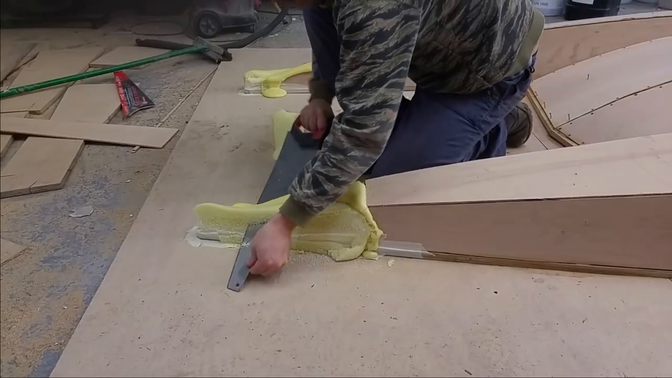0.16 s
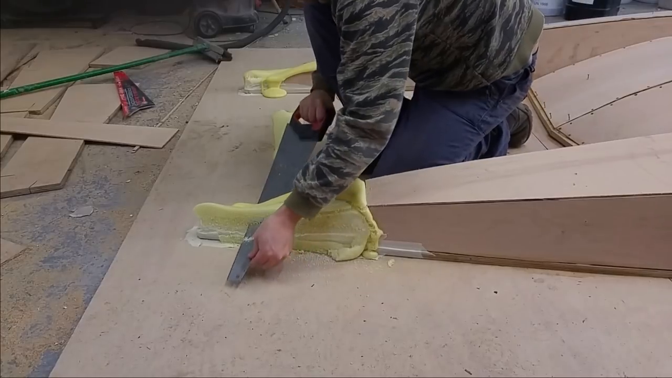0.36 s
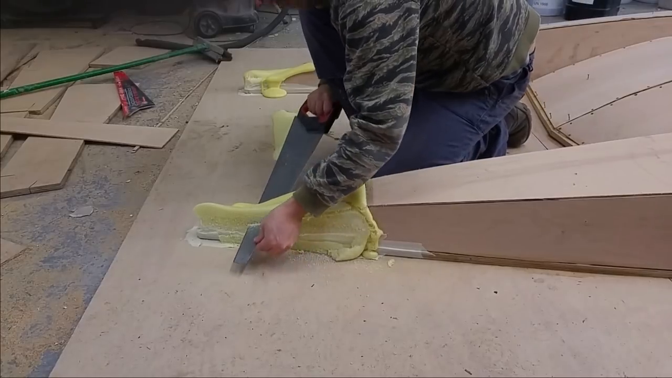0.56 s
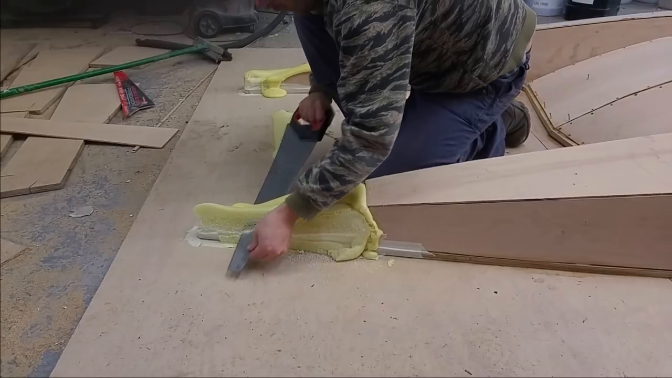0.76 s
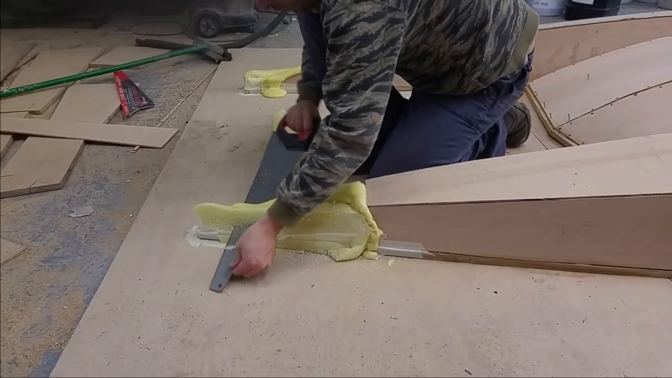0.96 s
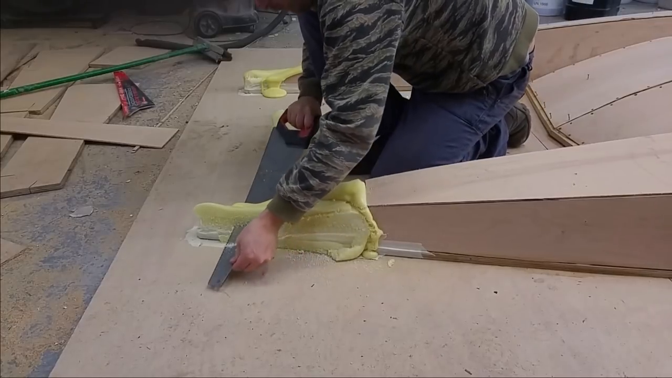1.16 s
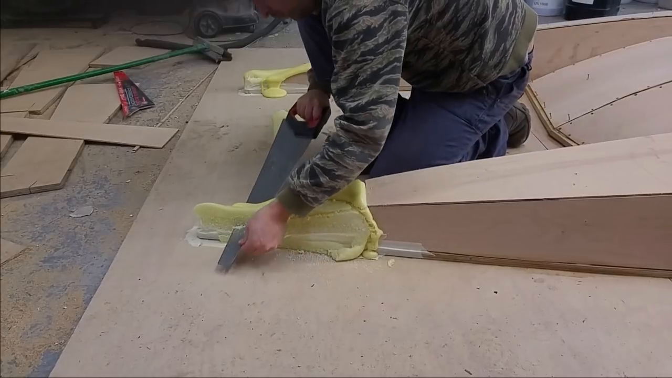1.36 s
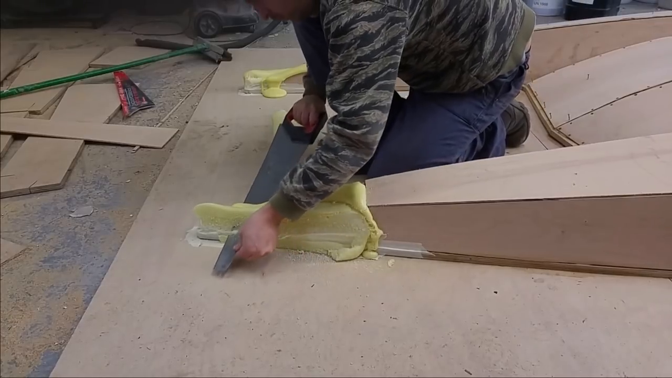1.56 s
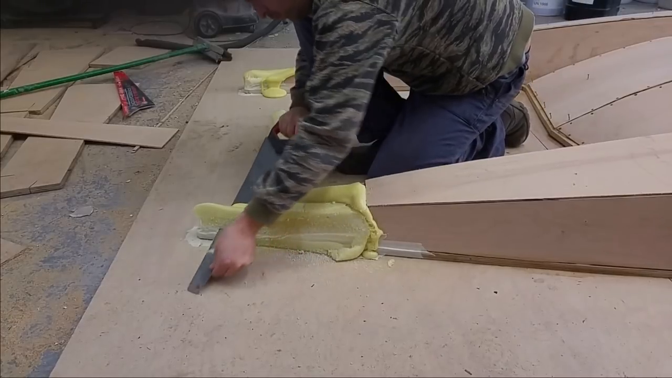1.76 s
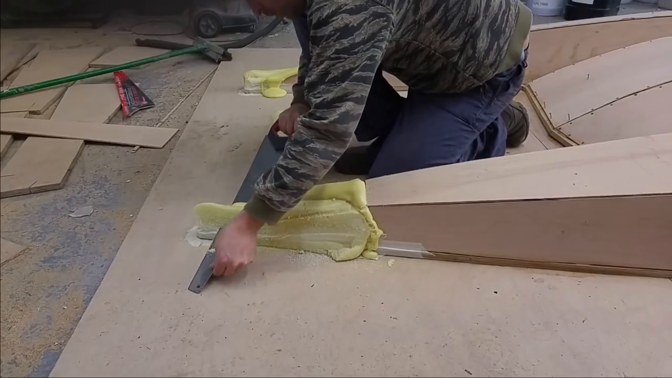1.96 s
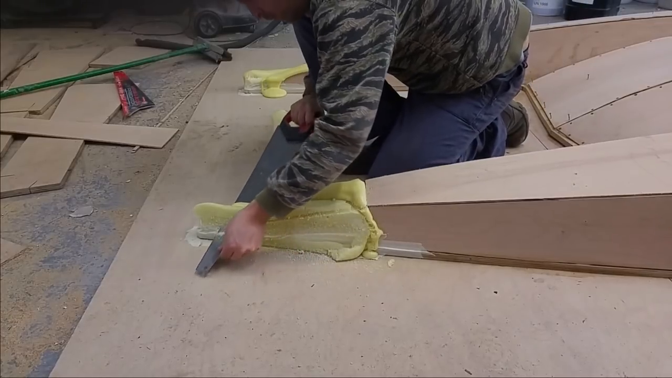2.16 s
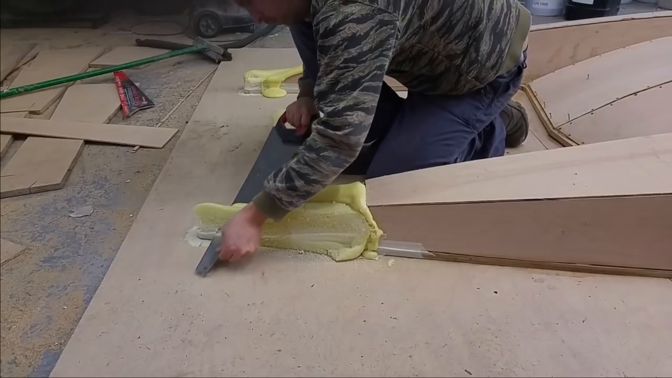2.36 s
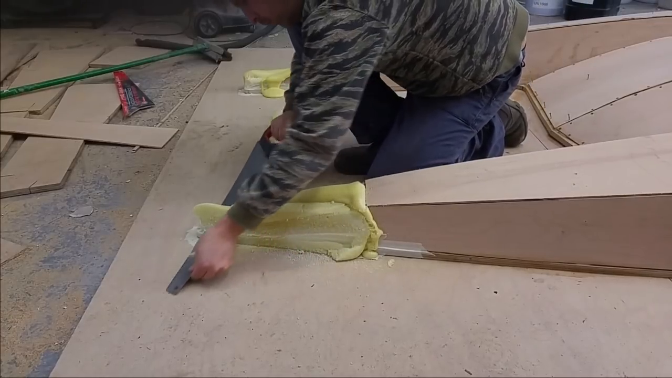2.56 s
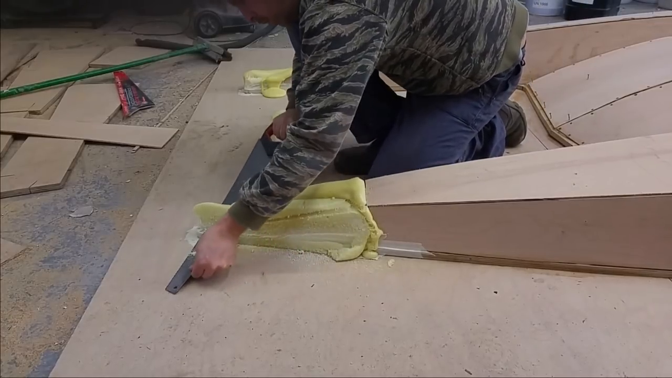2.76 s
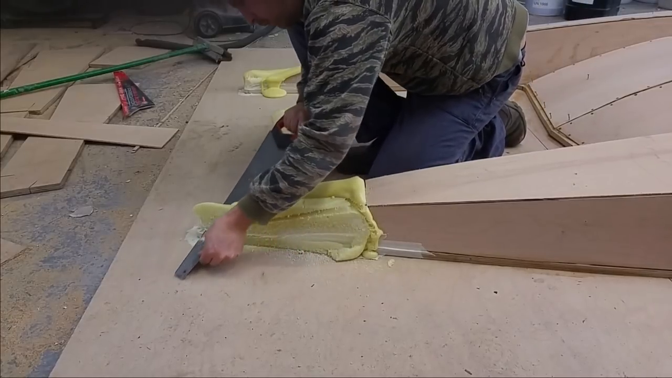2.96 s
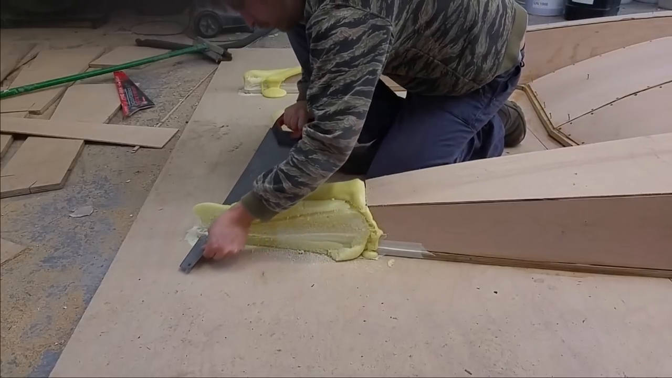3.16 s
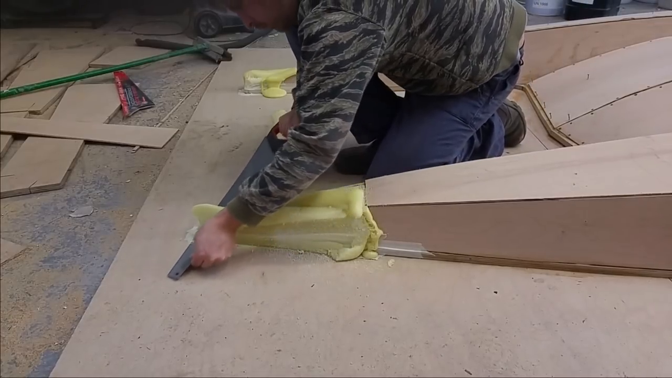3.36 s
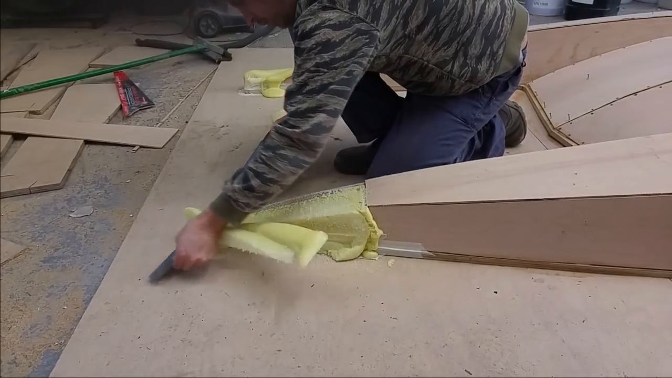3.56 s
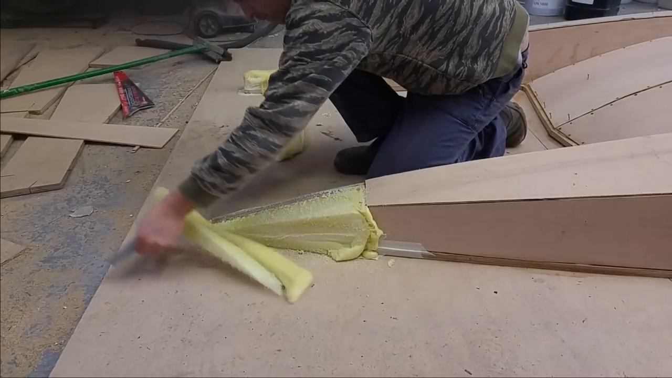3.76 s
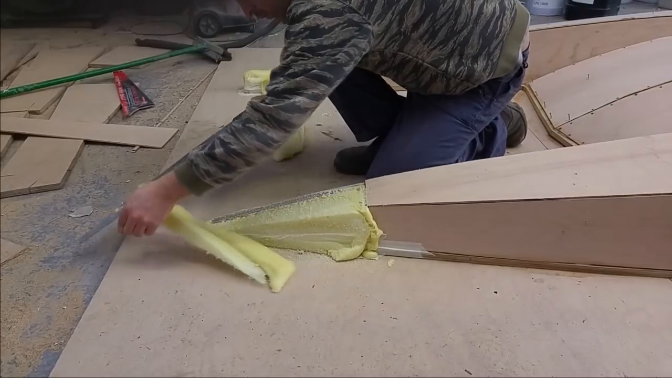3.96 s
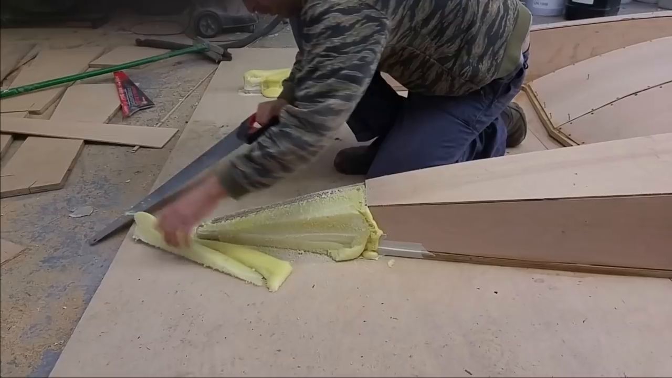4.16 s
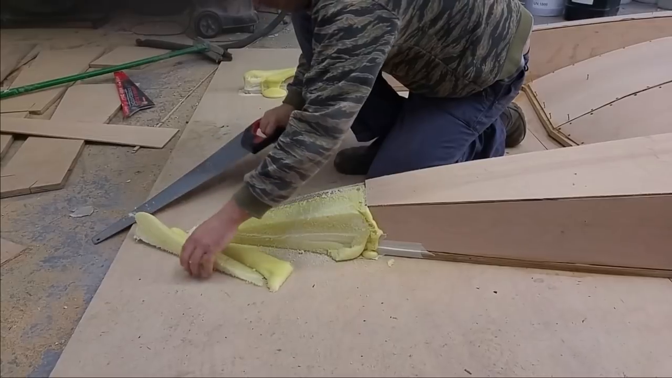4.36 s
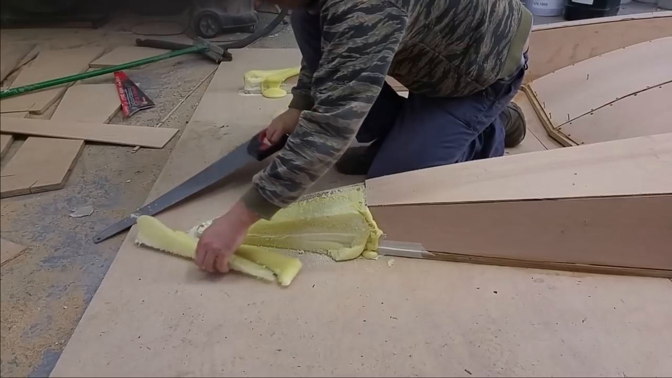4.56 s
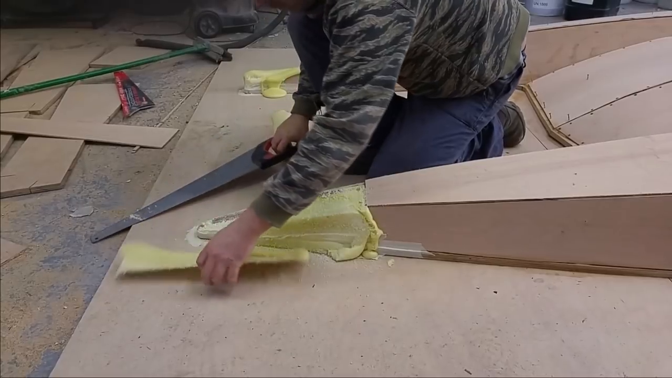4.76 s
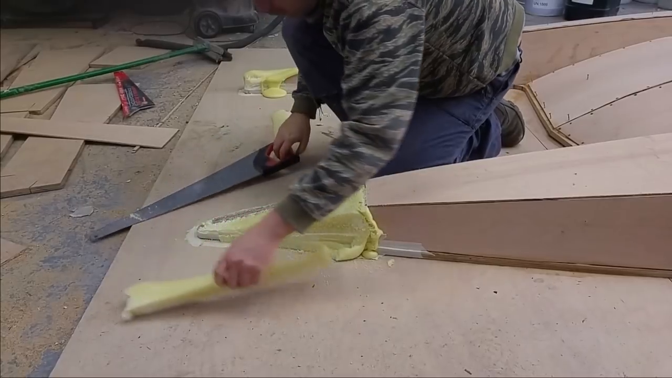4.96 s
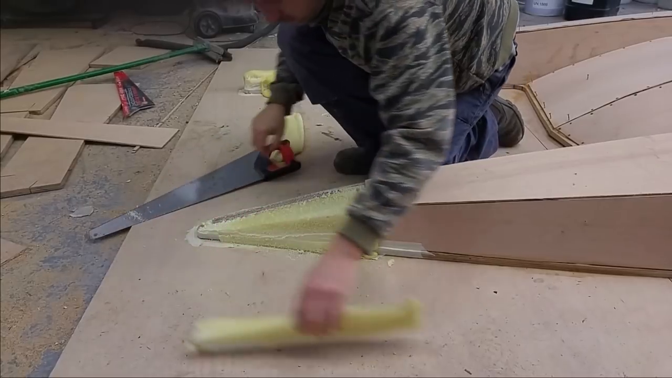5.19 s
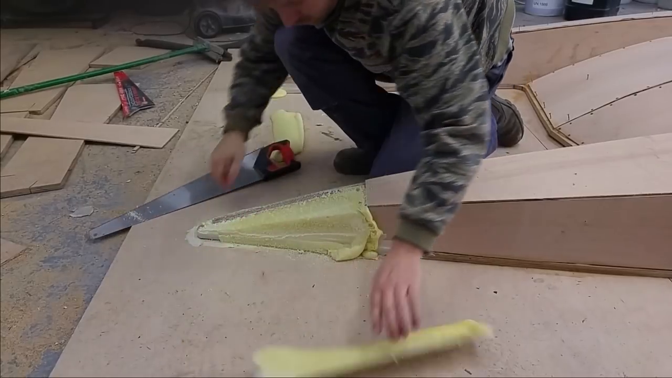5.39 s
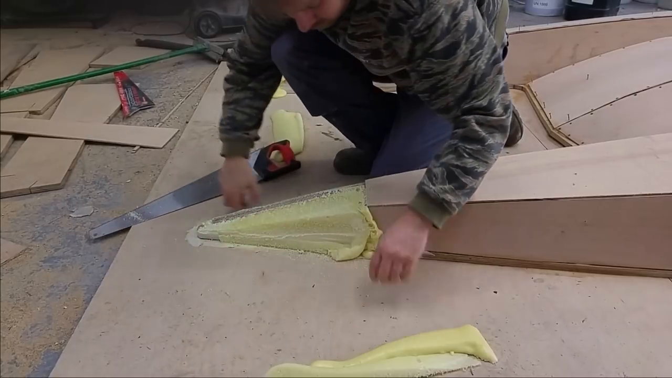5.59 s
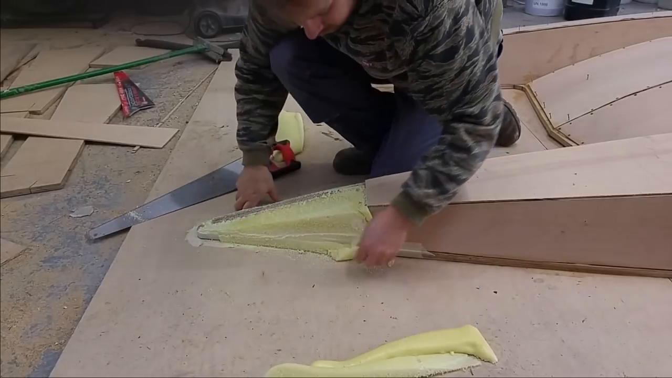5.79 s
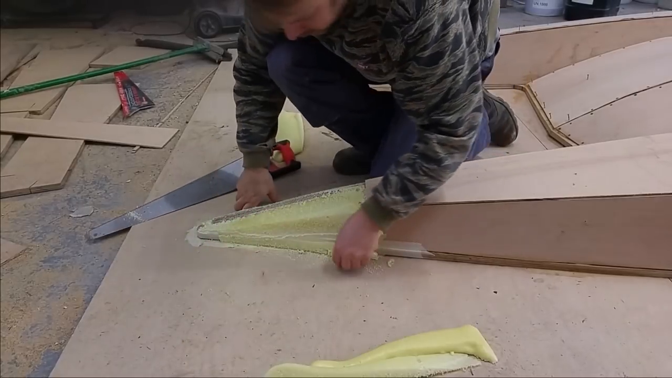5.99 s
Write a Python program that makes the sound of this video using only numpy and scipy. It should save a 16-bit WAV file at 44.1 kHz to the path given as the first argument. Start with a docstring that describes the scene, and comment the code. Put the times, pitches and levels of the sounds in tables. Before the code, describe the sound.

A handsaw rasps to and fro through hardened foam in a workshop, then the offcut cracks loose, scuffs and knocks on plywood.

```python
"""A handsaw is drawn to and fro, close by, through hardened foam on a plywood board in a workshop.
Grains stand for the foam cells its teeth burst; shaped grains tear, ring the blade and shake the board.
Then the offcut is pulled off, dragged, snapped and dropped: scuffing grains, cracks and ringing knocks.
Noise tails give the room, shaped noise a far machine's rumble; two close ports sit in a small housing."""
import sys
import numpy as np
from scipy import signal
from scipy.fft import rfft, irfft, next_fast_len
from scipy.io import wavfile

SR = 44100
rng = np.random.default_rng(int(sys.argv[2]) if len(sys.argv) > 2 else 0)


def store_pcm(level_fs):
    """Save levels as 16-bit WAV."""
    pcm = np.round(np.clip(level_fs, -1, 1) * 32767).astype(np.int16)
    wavfile.write(sys.argv[1], SR, np.atleast_2d(pcm).T)


N = 265923
TIME = np.arange(N) / SR   # s
SIZE = next_fast_len(N + SR)   # transform length, with a second to spare for the reverberation
HZ = np.maximum(np.fft.rfftfreq(SIZE, 1 / SR), 1)

# coarse shreds of foam tearing: f/Hz, relative level/dB per Hz
TEARING = [(500, -64), (1200, -6.5), (2500, -1), (4000, -1.5), (7000, -7)]
# fizz at the top of the treble: f/Hz, relative level/dB per Hz
FIZZ = [(6000, -4), (10000, 1.5), (13000, 0), (16500, -5)]
# foam and sleeve scuff the wood: t/s, length/s, level/dB, level at the end/dB re start,
# coarse part/dB re scuff, top fizz/dB re scuff
SCUFFS = [(3.494, 0.12, -36, -4, 0, -4), (3.631, 0.15, -30, -17.5, -2, -22),
          (3.816, 0.092, -32, -13.5, 1, 1), (3.956, 0.1, -42.5, -2.5, 1.5, -10),
          (4.112, 0.025, -35.5, -14, 4, -10), (4.164, 0.062, -39, -10, 5, -14),
          (4.417, 0.1, -47.5, -6, -6, -1), (4.514, 0.11, -41.5, -7, 0, -2),
          (4.669, 0.23, -38.5, -9, -9, -4), (4.96, .11, -45.5, 3, -14, -7), (5.084, 0.13, -35, -7, 1, -28),
          (5.28, 0.12, -42, -1, 3, -1), (5.512, 0.093, -38, -18, -1, -14)]


def saw():
    """Fine cells burst, coarse shreds tear and ring the blade, and the uneven bite shakes the board."""
    # bursting cells: f/Hz, relative level/dB per Hz
    cell_spectrum = [(1500, -45), (3000, -15.5), (5000, -1.5), (7000, -1.5), (10000, -7), (16000, -31)]
    # blade modes: f/Hz, width/Hz, middle gain/dB
    blade_modes = [(1920, 45, -9), (2050, 81, -33), (2660, 51, -31), (2884, 220, -11), (3360, 350, -16.5)]
    burst_gain, tear_gain, shake_gain, deep_gain, fizz_gain = strokes()
    bite = amp(1.2 * drift(40) + 1.8 * drift(250))
    cells = colour(spread(9000, 3.5), cell_spectrum)
    cells = rms_one(patchy(cells, patch_db=1.6, rate_hz=7))
    shreds = colour(spread(3000, 1.2), TEARING)
    blade = 0
    for hz, width_hz, db in blade_modes:
        # the bending blade favours now one mode, now another
        blade = blade + amp(db + 3.6 * drift(7.1)) * resonance(shreds, hz, width_hz)
    tearing = rms_one(shreds + blade)
    fizz = colour(spread(9000, 0.64), FIZZ)
    deep, upper = board(grains(1500, 4.15))
    foam = burst_gain * cells + tear_gain * tearing + fizz_gain * fizz
    shake = shake_gain * rms_one(upper) + deep_gain * rms_one(deep)
    return bite * (foam + shake)


def strokes():
    """Gains of five layers: each stroke bites, swells, fades and lets go; layers follow the effort unevenly."""
    # push and pull in turn: t/s, bite/s, swell/s, fade/s, cell level at the crest/dB,
    # effort at the first bite/dB re crest, effort at the end of the stroke/dB re crest,
    # then level at the crest/dB re cells: coarse tearing, board shake, deep board shake, top fizz
    stroke_table = [(-0.06, 0.044, 0.15, 0.041, -16.5, -4, -5.5, -3, 0, -4, -8),
                    (0.344, 0.042, 0.041, 0.15, -25, -0.5, 0.5, -3, -1.5, -6.5, -4.5),
                    (0.709, 0.023, 0.15, 0.078, -16, -9, -5, -2, 1.5, -5.5, -14),
                    (1.185, 0.046, 0.13, 0.053, -23, -4, -1, -4, -6, -11, -6),
                    (1.529, 0.057, 0.15, 0.071, -19, -6, -3, -3.5, 0.5, -7.5, -6.5),
                    (2.009, 0.066, 0.084, 0.11, -22, -3, -5, -5.5, -8.5, -16.5, -7),
                    (2.375, 0.061, 0.14, 0.063, -20, -4.5, -7, -5, 0.5, -6, -6.5),
                    (2.84, .07, 0.014, 0.21, -27, 0.5, -5, -8, -6.5, -14, -3),
                    (3.215, 0.079, 0.13, 0.053, -25, -3.5, -10, -6, -5, -10, -6)]
    # extra level per effort/dB per dB: cells, tearing, shake, deep shake, fizz
    steepness = [0.26, -0.18, 0.65, 0.96, -0.00061]
    # added fall once the stroke ends/dB per s: same five layers
    extra_fall = [-22, 83, 150, 150, 186]
    bite_from_db, let_go_db_per_s = -16.5, 95   # effort: the teeth catch; the blade slows to a halt
    power = np.zeros((5, N))
    for s, bite_s, swell_s, fade_s, db, bite_db, end_db, *mix_db in stroke_table:
        corners = s + np.cumsum(np.maximum([0, bite_s, swell_s, fade_s], .001))
        after = np.maximum(TIME - corners[-1], 0)
        effort = np.interp(TIME, corners, [bite_db + bite_from_db, bite_db, 0, end_db])
        effort = effort - let_go_db_per_s * after
        layer_db = db + np.c_[[0, *mix_db]] + (1 + np.c_[steepness]) * effort
        layer_db = layer_db - np.c_[extra_fall] * after
        power += amp(layer_db) ** 2 * (TIME >= s)
    return np.sqrt(power)


def spread(per_s, spread_db):
    """Grains from all along the cut: partly shared, partly different at the two ports."""
    scatter = .45   # share of the grains that each port hears on its own
    own = np.array([grains(per_s * scatter, spread_db), grains(per_s * scatter, spread_db)])
    return grains(per_s * (1 - scatter), spread_db) + own


def grains(per_s, spread_db):
    """Random clicks of uneven size and either sign."""
    sizes = amp(spread_db * np.minimum(rng.exponential(1, N), 5))
    signs = rng.choice([-1, 1], N)
    return sizes * signs * (rng.random(N) < per_s / SR)


def patchy(x, patch_db, rate_hz):
    """The colour shifts as harder and softer foam passes: each band swells on its own."""
    # band edges: f/Hz
    edges = [800, 3500, 5000, 6500, 8000, 10500, 17000]
    out = 0
    for k, edges_hz in enumerate(zip(edges, edges[1:])):
        band = signal.sosfilt(signal.butter(2, edges_hz, "band", fs=SR, output="sos"), x)
        out = out + (-1) ** k * amp(patch_db * drift(rate_hz)) * band   # signs alternate so bands join
    return out


def board(force):
    """The plywood rings in broad modes, signs alternating; returns the deep and the upper modes."""
    # plywood modes: f/Hz, width/Hz, gain/dB
    board_modes = [(149.6, 12.5, -3.5), (214.6, 31, -5.5), (303, 33, 3.5), (356, 49, -0.5),
                   (429.4, 38, 6.5), (611, 87, 3), (701, 85, 2), (810, 65, -2.5), (972, 70, -3.5),
                   (1510, 540, -26), (1760, 56, -12.5)]
    force = signal.sosfilt(signal.butter(2, 110, "high", fs=SR, output="sos"), force)
    rings = []
    for k, (hz, width_hz, db) in enumerate(board_modes):
        rings.append((-1) ** k * amp(db) * resonance(force, hz, width_hz))
    rings = np.array(rings)
    deep = np.array(board_modes)[:, 0] < 340   # Hz
    return rings[deep].sum(axis=0), rings[~deep].sum(axis=0)


def resonance(x, hz, width_hz):
    """One mode as a two-pole filter, gain about 1 on top."""
    r = np.exp(-np.pi * width_hz / SR)
    poles = [1, -2 * r * np.cos(2 * np.pi * hz / SR), r * r]
    return signal.lfilter([1 - r, 0, r - 1], poles, x + 1e-18)


def snaps():
    """A single crack followed by a short crumble, in a dull, a bright and a top part; stereo."""
    # foam snaps: t/s, peak level of the bright part/dB, dull part gain/dB, top part gain/dB, left-right/dB
    snap_table = [(3.6425, -8, -0.5, -12, -4), (3.6499, -20, -16, -11, 12), (3.824, -19, -20, -8, 8),
                  (3.838, -10, -2, -11, 11), (3.846, -14.5, -14, -1, 21), (3.961, -18, -6, -3, 7),
                  (3.9905, -11, -25, -20, 15), (3.998, -9.5, -29, -7, -13), (4.1203, -18, -16, -9, 10),
                  (4.163, -10, -10, -13, 7), (4.4204, -23, -19, -8, -12), (4.451, -29, -22, -9, 15),
                  (4.5296, -17.5, -11, -13, 6), (4.6745, -24, -23, -11, 16), (4.7002, -19, -17, -11, 1.5),
                  (4.8913, -27, -20, -6, 7), (4.9761, -20, -16, -8, 4.5), (5.091, -19, 5, -11, -6),
                  (5.2858, -22, -14, 5, 7), (5.299, -29, -3, -14, 6), (5.3665, -16, -12, -2, -6),
                  (5.3898, -22, 4, -14, 13), (5.517, -25, 3, 2, 2), (5.5203, -14.5, -3.5, -6, -11.5)]
    crumble_db, crumble_t60_s = -17, .02   # crumble noise at its start re the raw crack; its decay
    out, after = np.zeros((2, N + SR)), np.arange(SR // 8) / SR
    noise = rng.standard_normal((len(snap_table), len(after)))
    bands_hz = [1500, 5000], [5000, 10000], [10000, 17000]
    filters = [signal.butter(2, edges_hz, "band", fs=SR, output="sos") for edges_hz in bands_hz]
    for (s, db, dull_db, top_db, pan_db), crumble in zip(snap_table, noise):
        burst = amp(crumble_db - 60 * after / crumble_t60_s) * crumble
        burst[0] = 1   # the crack itself
        dull, bright, top = (signal.sosfilt(part, burst) for part in filters)
        burst = (amp(dull_db) * dull + bright + amp(top_db) * top) / np.abs(bright).max()
        at = round(s * SR)
        sides_db = db + np.array([[pan_db], [-pan_db]]) / 2
        out[:, at:at + len(after)] += amp(sides_db) * burst
    return out[:, :N]


def knocks():
    """A rounded push thumps and sets the board's modes ringing; a shudder follows as the piece settles."""
    # knocks on the board: t/s, peak level/dB, deep modes gain/dB, shudder/dB re peak
    knock_table = [(3.646, -9, -4, -22), (3.836, -11, -3.5, -26), (4.001, -27, 4, -1), (4.117, -21, 6, -9),
                   (4.16, -27, 3, -8), (4.4, -25, -5, -5), (5.089, 0.5, -8, -15), (5.299, -11.5, 7, -24),
                   (5.387, -17.5, -1, -20), (5.515, -19.5, -4, -19)]
    shudder_rise_s, shudder_t60_s = 0.0095, 0.37
    out, after = np.zeros(N), np.arange(SR // 3) / SR
    noise = rng.standard_normal((len(knock_table), len(after)))
    push = after * np.exp(-2 * np.pi * 1100 * after)
    push = push / push.max()
    thump = 1.55 * resonance(resonance(push, 566, 470), 620, 400)   # steep skirts: a dull, round blow
    for (s, db, deep_db, shudder_db), jitter in zip(knock_table, noise):
        deep, upper = board(push)
        rung = thump + amp(deep_db) * deep + upper
        deep, upper = board(jitter)
        swell = np.clip(after / shudder_rise_s, 0, 1) * amp(shudder_db - 60 * after / shudder_t60_s)
        shudder = swell * rms_one(amp(deep_db) * deep + upper)
        at = round(s * SR)
        out[at:at + len(after)] += amp(db) * (rung / np.abs(rung).max() + shudder)
    return out


def rustle():
    """Sparser, crisper grains and stray ticks as foam slides over wood, with the board shaking under it."""
    # foam brushing wood: f/Hz, relative level/dB per Hz
    brush_spectrum = [(1500, -1.5), (3000, -6.5), (5000, 0.5), (7000, 4), (10000, -6.5), (16000, -34)]
    shake_db, shake_at_db, shake_follows = -43, -47.5, 0.68   # board level at that scuff level; share of its swing
    fine_gain, coarse_gain, fizz_gain = scuffs()
    brush = colour(spread(3000, 4.5), brush_spectrum)
    ticks = amp(-2.5) * colour(spread(60, 1.3), brush_spectrum)
    shreds = colour(spread(1500, 1.1), TEARING)
    fizz = colour(spread(3000, 4.5), FIZZ)
    shake_gain = amp(shake_db) * (fine_gain / amp(shake_at_db)) ** shake_follows
    shake_gain = shake_gain * (TIME > SCUFFS[0][0])
    shake = rms_one(sum(board(grains(600, 3.2))))
    clumps = amp(2.5 * drift(40))
    scuffing = fine_gain * (brush + ticks) + coarse_gain * shreds + fizz_gain * fizz
    return clumps * (scuffing + shake_gain * shake)


def scuffs():
    """Fine, coarse and top gains: each scuff starts fast, changes level and dies, over a faint idle rustle."""
    attack_s, dies_db_per_s, idle_db = 0.0054, 156, -57
    idle = amp(idle_db + np.c_[[0, -2, -22]])
    power = idle ** 2 * (TIME > SCUFFS[0][0]) + 1e-12
    for s, length_s, db, end_db, *mix_db in SCUFFS:
        since = TIME - s
        sag_db = end_db * np.clip(since / length_s, 0, 1)
        sag_db = sag_db - dies_db_per_s * np.maximum(since - length_s, 0)
        gain = amp(db + np.c_[[0, *mix_db]] + sag_db) * np.clip(since / attack_s, 0, 1)
        power = power + gain ** 2
    return np.sqrt(power)


def workshop(x, count=6):
    """Reverberation: diffuse noise that dies band by band; the echo pattern shifts as the hands move."""
    # reverberation time: f/Hz, T60/s
    room_t60 = [(100, 0.95), (500, 0.15), (2000, 0.82), (7000, 0.25), (14000, 0.11)]
    room_db, onset_s = -4, 0.0037   # silent up to the onset, full at twice that
    after, tails = np.arange(SR) / SR, 0
    edges = 60 * 2. ** np.arange(9)   # octave bands, Hz
    white = rng.standard_normal((count, 2, SR))
    for low, high in zip(edges, edges[1:]):
        band = signal.sosfilt(signal.butter(1, [low, high], "band", fs=SR, output="sos"), white)
        t60 = at_hz(room_t60, np.sqrt(low * high))
        tails = tails + band * amp(-60 * after / t60) / np.sqrt(t60)
    tails = tails * np.clip(after / onset_s - 1, 0, 1)
    tails = tails / np.sqrt(np.sum(tails ** 2) / 2 / count)
    # drifting shares of the sound feed the tails, at constant total power
    shares = np.array([drift(3.6) for tail in tails])
    shares = shares / np.sqrt(np.sum(shares ** 2, axis=0))
    out = sum(rfft(x * share, SIZE) * diffuse(tail) for share, tail in zip(shares, tails))
    return amp(room_db) * irfft(out, SIZE)[:, :N]


def rumble():
    """A far machine fills the room: diffuse shaped noise whose level wavers a little."""
    # machine rumble: f/Hz, relative level/dB per Hz
    rumble_spectrum = [(20, -45), (35, -37), (50, -2.5), (66, 0), (79, 3.5), (95, -2), (115, -14),
                       (250, -13), (450, -6), (740, -1.5), (1100, -13.5), (1700, -25), (3500, -46),
                       (9000, -43), (15500, -57)]
    noise = irfft(diffuse(rng.standard_normal((2, SIZE))), SIZE)
    return amp(-31 + 0.12 * drift(20.0)) * colour(noise, rumble_spectrum)


def diffuse(white):
    """Spectra of two noises mixed to left and right: alike in the bass, less so higher up."""
    # diffuse sound at the two ports: f/Hz, left-right likeness (1 = same, 0 = unrelated, below 0 = opposed)
    likeness = [(60, 1), (250, 0.92), (600, 0.62), (1200, -0.35), (3000, 0.21), (6000, -0.04),
                (12000, 0.64)]
    alike = np.clip(at_hz(likeness, HZ), -1, 1)
    mid, side = rfft(white, SIZE) * np.sqrt([1 + alike, 1 - alike])
    return np.array([mid + side, mid - side]) / np.sqrt(2)


def amp(db):
    """Decibels to gain."""
    return 10 ** (np.asarray(db) / 20)


def rms_one(x):
    """Scale to rms 1."""
    return x / np.sqrt(np.mean(x ** 2) + 1e-20)


def at_hz(points, hz):
    """Read a table on a log-frequency axis."""
    table_hz, values = np.array(points).T
    return np.interp(np.log(hz), np.log(table_hz), values)


def colour(x, spectrum):
    """Noise or grains shaped by a spectrum; rms 1."""
    shaped = rfft(x, SIZE) * amp(at_hz(spectrum, HZ))
    return rms_one(irfft(shaped, SIZE)[..., :N])


def drift(rate_hz):
    """Slow chance of spread 1: noise through a two-pole low-pass."""
    r = np.exp(-2 * np.pi * rate_hz / SR)
    noise = rng.standard_normal(N + SR)
    return rms_one(signal.lfilter([1], [1, -2 * r, r * r], noise)[SR:])


def scene():
    """Direct sound reaches the left port first; the room follows, less for the snaps aimed at the ports."""
    port_lag_s = .00006
    work, cracks = saw() + rustle() + knocks(), snaps()
    lag = np.exp(-2j * np.pi * HZ * port_lag_s * np.array([[0], [1]]))
    direct = irfft(rfft(work + cracks, SIZE) * lag, SIZE)[:, :N]
    into_room = (work + amp(-3.0) * cracks).mean(axis=0)
    return direct + workshop(into_room) + rumble()


def record(dry):
    """The housing colours each port, peaks are rounded, the top is cut."""
    # housing resonances and dips: f/Hz, width/Hz, left gain/dB, right gain/dB
    housing = [(518, 70.5, -17, -16.5), (7220, 1790, 6.5, 8), (7830, 170, -21.5, 1),
               (8470, 1500, 7.5, -1.5)]
    out = dry.copy()
    for hz, width_hz, *db in housing:
        w = 2 * np.pi * hz / SR
        a = np.sin(w) * width_hz / hz / 2
        turn = -2 * np.cos(w)
        for side, g in enumerate(amp(np.array(db) / 2)):
            out[side] = signal.lfilter([1 + a * g, turn, 1 - a * g], [1 + a / g, turn, 1 - a / g], out[side])
    out = 1.187 * np.tanh(out / 1.23)
    cutoff_hz = 15850
    return signal.sosfilt(signal.ellip(14, .5, 75, cutoff_hz, fs=SR, output="sos"), out)


dry = scene()
out = record(dry)
store_pcm(out)
```